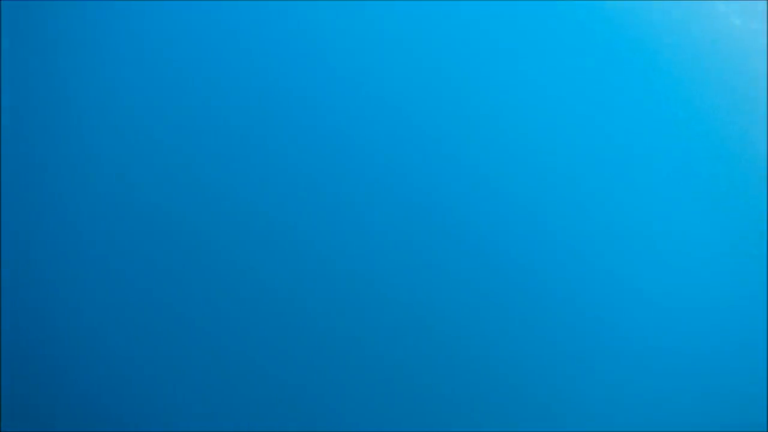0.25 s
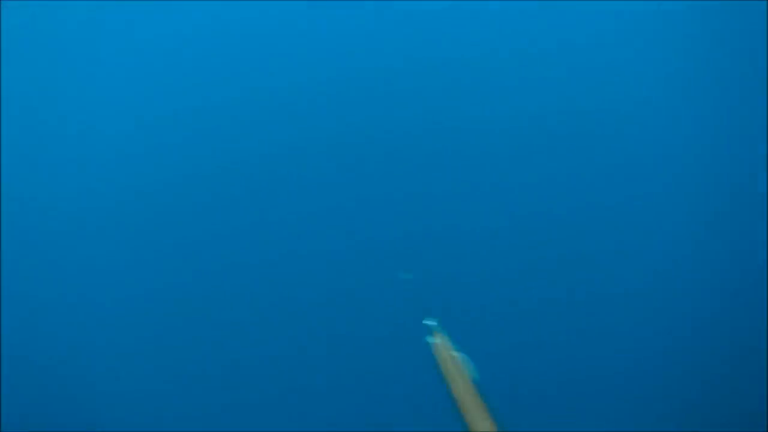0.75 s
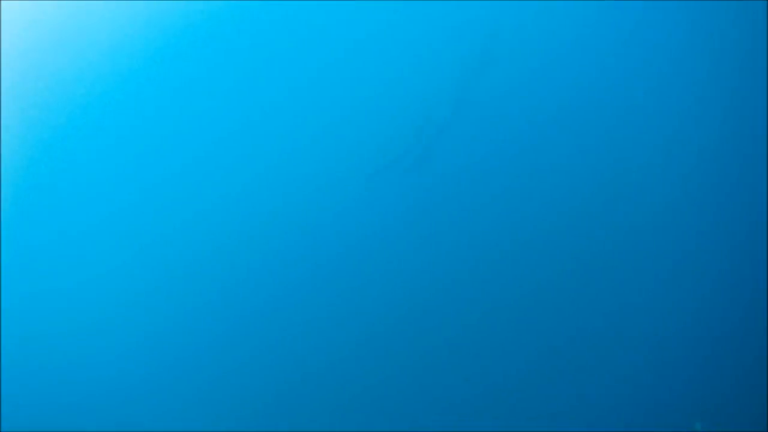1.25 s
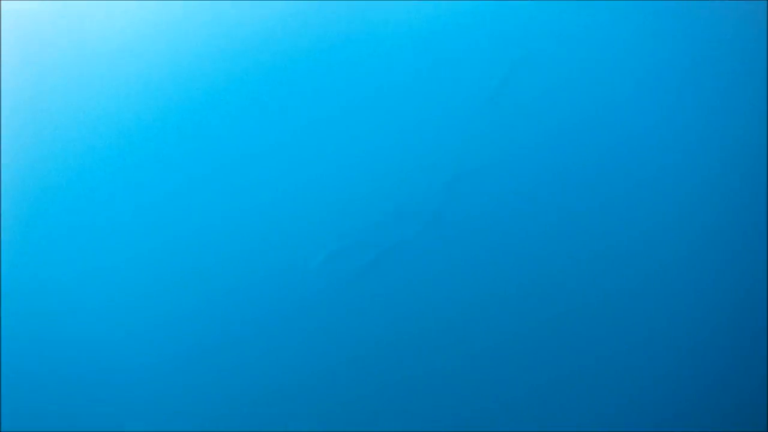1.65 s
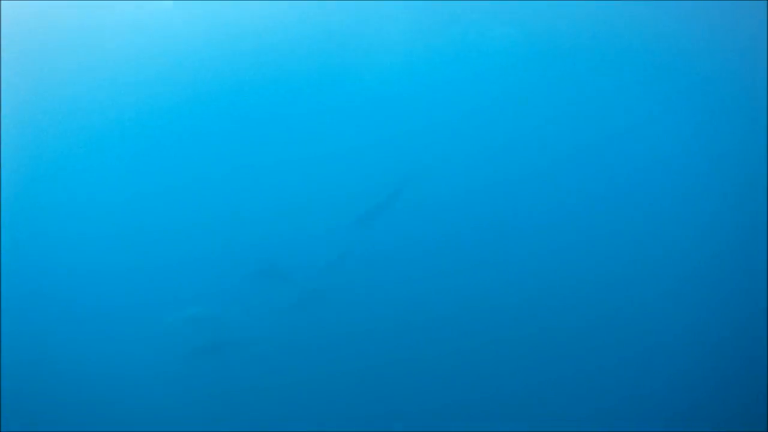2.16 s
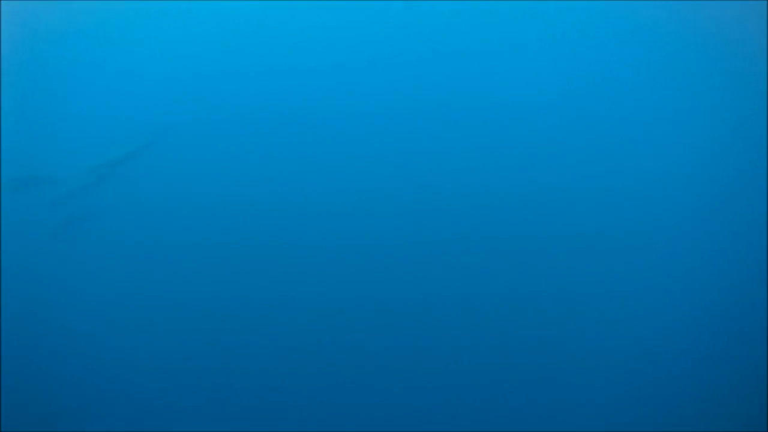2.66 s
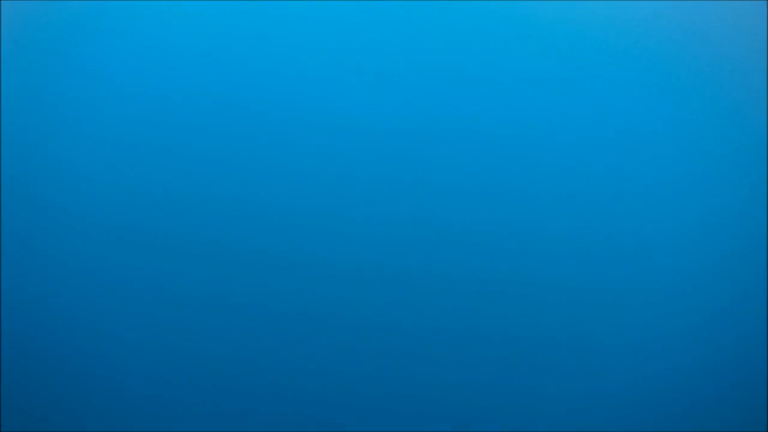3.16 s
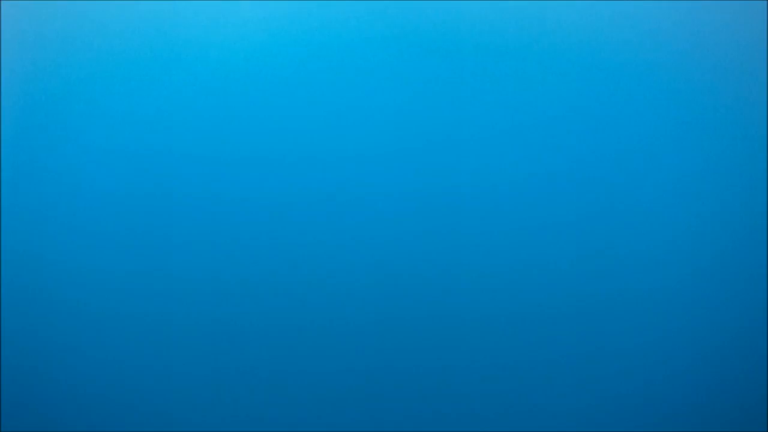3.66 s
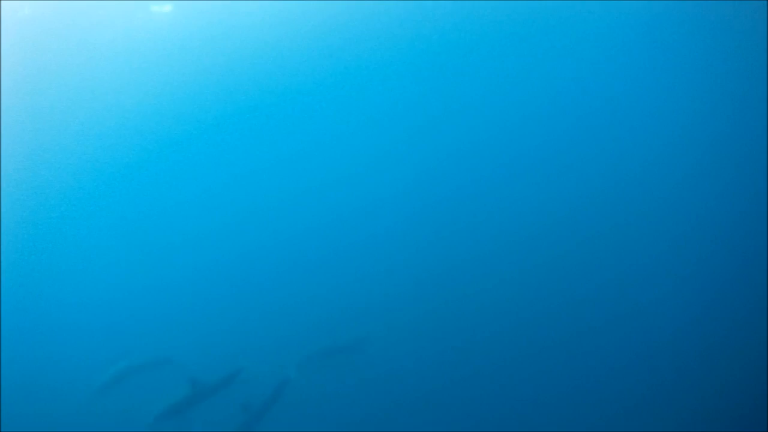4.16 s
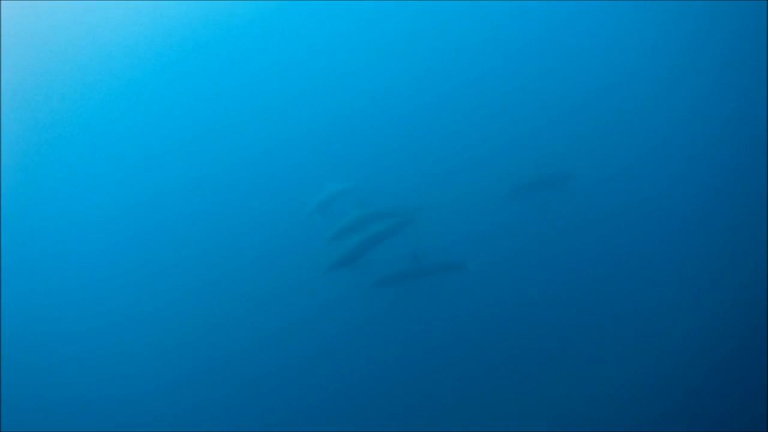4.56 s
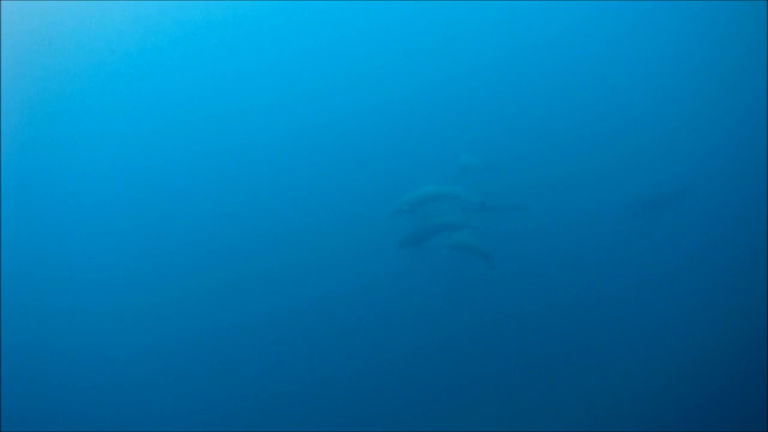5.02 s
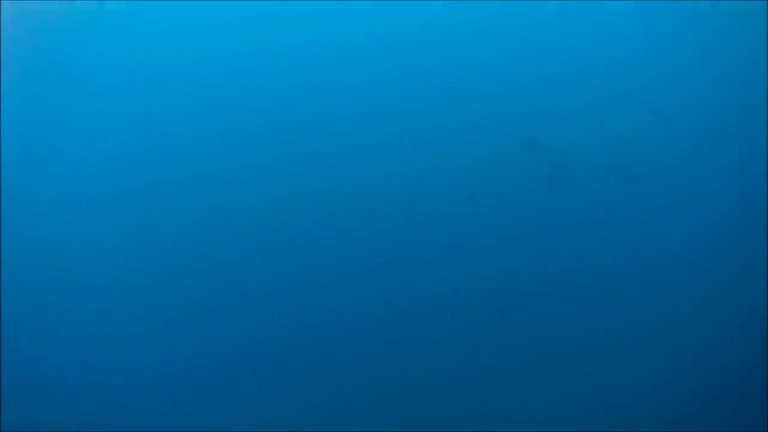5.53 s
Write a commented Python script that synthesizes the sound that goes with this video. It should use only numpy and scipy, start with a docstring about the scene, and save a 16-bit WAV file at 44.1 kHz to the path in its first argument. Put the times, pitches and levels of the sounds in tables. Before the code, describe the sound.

Muffled underwater rumble and hollow wash inside a camera case, with sharp knocks clustered early and mid-way, and faint dolphin whistles, clearest near five seconds.

```python
"""The sea rumbles and washes round a watertight camera housing throughout, while knocks land on its case now and then.
Place: under the open sea, the microphone inside the case; noise is shaped by flow, wash bands and resonances.
At the case: knocks, bumps and ticks are short pulses, rubs and snaps are noise bursts, hums are sagging tones.
At a distance: dolphins whistle faintly, as tones with bending pitch; all but the nearest are smeared by late paths.
The mono recorder samples slowly and holds each value, which adds a thin, mirrored treble."""
import sys
import numpy as np
from scipy import signal
from scipy.fft import rfft, irfft, next_fast_len
from scipy.io import wavfile
from scipy.ndimage import map_coordinates

SR = 44100
rng = np.random.default_rng(int(sys.argv[2]) if len(sys.argv) > 2 else 0)


def log_audio(samples):
    """Write samples as a 16-bit WAV file to the path given in sys.argv[1]."""
    # one column per channel
    frames = np.atleast_2d(samples).T
    # limit to full scale, then quantise
    limited = np.clip(frames, -1, 1)
    pcm = np.round(limited * 32767).astype(np.int16)
    wavfile.write(sys.argv[1], SR, pcm)


N = 255339


def amp(db):
    """Decibels to gain."""
    return 10 ** (np.asarray(db) / 20)


def unit(x):
    """x at rms 1."""
    return x / np.sqrt(np.mean(x ** 2) + 1e-20)


def bell(x):
    """Gaussian of a distance given in standard deviations."""
    return np.exp(-.5 * x ** 2)


def shape(points, hz):
    """Gain through (f/Hz, level/dB) points, joined on a log frequency axis."""
    f, db = np.transpose(points)
    return amp(np.interp(np.log(hz + 1), np.log(f + 1), db))


def curves(rows):
    """One value per sample for each column after the time."""
    s, *columns = np.transpose(rows)
    return [np.interp(np.arange(N) / SR, s, column) for column in columns]


def wobble(rate):
    """A smooth random curve, rate knots a second."""
    at = np.linspace(0, N * rate / SR, N // 16)
    coarse = map_coordinates(rng.standard_normal(int(at[-1]) + 4), [at])
    return np.interp(np.arange(N) * rate / SR, at, coarse)


def filtered(x, response):
    """x times a response of frequency."""
    m = next_fast_len(N + SR // 2)
    return irfft(rfft(x, m) * response(np.fft.rfftfreq(m, 1 / SR)), m)[:N]


def noise(response):
    """Coloured noise of rms 1."""
    return unit(filtered(rng.standard_normal(N), response))


def contacts(rows, scuff_db=-10.5, scuff_s=0.0063):
    """Each contact is a short push and pull, then a brief random scuff as it settles."""
    half = SR // 25
    t = np.arange(-half, half) / SR
    out = np.zeros(N + SR)
    for s, db, hz, cycles in rows:
        push = amp(db) * bell(t * hz / cycles) * np.sin(2 * np.pi * hz * t)
        scuff = rng.standard_normal(half) * np.exp(-t[half:] / scuff_s)
        tail = signal.fftconvolve(push, scuff / np.linalg.norm(scuff))[:len(t)]
        out[round(s * SR):][:len(t)] += push + amp(scuff_db) * tail
    return out[half:half + N]


def tone(start, end, hz, db, waver, flutter_db, fade_s=0.0074):
    """A tone whose pitch and level tremble."""
    t = np.arange(N) / SR
    gate = np.clip(np.minimum(t - start, end - t) / fade_s, 0, 1)
    phase = 2 * np.pi * np.cumsum(hz * (1 + waver * wobble(150))) / SR
    return gate * amp(db + flutter_db * wobble(45)) * np.sqrt(2) * np.sin(phase)


def glide(start, length, db, pitches, edge_db, waver, flutter_db):
    """A tone that swells and fades while its pitch bends in one arc through start, middle and end."""
    u = np.clip(2 * (np.arange(N) / SR - start) / length - 1, -1, 1)  # -1 at the start, 1 at the end
    first, middle, last = pitches
    slope = (last - first) / 2
    bend = (first + last) / 2 - middle
    hz = middle + slope * u + bend * u ** 2
    return tone(start, start + length, hz, db - edge_db * u ** 2, waver, flutter_db)


def wall(x, edge_hz=2480, order=10):
    """The thick wall of the case lets little treble through."""
    return signal.sosfilt(signal.butter(order, edge_hz, fs=SR, output="sos"), x)


def housing(x, round_trip_hz=657, stretch=0.944, echo=0.36, ring=0.49):
    """Sound runs to and fro in the case: a comb of resonances, spread a little wider than harmonics."""
    def response(hz):
        trip = np.exp(-2j * np.pi * (hz / round_trip_hz) ** stretch)
        return (1 + echo * trip) / (1 - ring * trip)
    return filtered(x, response)


# Hard contacts on the case, before wall and housing:
# [t/s, level/dB of the pulse scale, f/Hz, Gaussian half length/cycles]
HARD_KNOCKS = [ (.2654, -23.5, 1010, 0.083), (.3277, -13, 1880, 0.53), (.328, -24.5, 364, 0.23),
               (.3593, -33.5, 630, .25), (.3669, -28, 950, 0.19), (.5317, -37.5, 640, 0.82),
               (.5445, -35, 600, 0.24), (.5615, -36.5, 610, 0.37), (.8458, -37, 2240, 0.56),
               (1.2073, -41, 1370, 0.95), (1.7932, -32.5, 1250, .14), (1.8719, -32, 890, 0.099),
               (2.0156, -35.5, 890, .23), (2.1925, -41, 880, 0.26), (2.244, -28, 900, 0.067),
               (2.3323, -25.5, 960, 0.12), (2.3727, -31, 1690, 0.38), (2.3758, -31, 1680, .41),
               (2.3807, -28, 2120, 0.83), (2.5568, -27.5, 1420, 0.3), (2.5714, -29.5, 830, 0.15),
               (2.6309, -24.5, 415, 0.24), (2.636, -26.5, 646, 0.32), (2.6845, -23.5, 900, 0.12),
               (2.6891, -25.5, 734, 0.27), (4.0167, -38.5, 1710, 0.53), (4.0209, -41, 1460, 0.57),
               (4.179, -37, 440, 0.16), (4.2072, -34, 1350, 0.51), (5.342, -33, 1250, 0.24),
               (5.3537, -33.5, 1550, .9), (5.3986, -29, 1790, 0.34), (5.4322, -34.5, 1570, .67),
               (5.4729, -32.5, 340, .17), (5.7747, -40.5, 500, 0.23)]
# Soft bumps of the grip, likewise: [t/s, level/dB of the pulse scale, Gaussian half length/cycles]
GRIP_BUMPS = [(.416, -37.5, .65), (0.644, -42.5, .27), (1.113, -37, 0.16), (2.379, -30.5, 0.1),
              (2.4425, -35, .16), (2.5384, -32, 0.15), (2.634, -24, 0.59), (2.776, -41, 0.39),
              (2.872, -39.5, 0.23), (2.903, -36, 0.13), (4.149, -43, 0.42), (4.207, -34, 0.18),
              (5.2359, -26.5, .22)]


def handling(bump_hz=161.3):
    """Hard knocks are quick pushes on the case; soft bumps are slow ones that share one low pitch."""
    bumps = [(s, db, bump_hz, cycles) for s, db, cycles in GRIP_BUMPS]
    return contacts(HARD_KNOCKS) + contacts(bumps)


# Sharp snaps right on the case: [t/s, level/dB before gain and colour, decay time constant/s]
CASE_SNAPS = [(0.4907, -22, 0.003), (0.5433, -26, 0.0023), (0.5529, -30.5, 0.0027)]
# Treble colour of every snap: [f/Hz, level/dB]
SNAP_SPECTRUM = [(600, -41), (1800, -5.5), (2400, 2.5), (3200, 1.5), (3750, 5), (4400, -5), (5200, 1),
                 (5900, -11)]


def snaps(gain_db=19.6, rattle_db=-2):
    """One instant crack, then a rattle that dies within a few milliseconds."""
    t = np.arange(SR // 25) / SR
    out = np.zeros(N)
    for s, db, decay_s in CASE_SNAPS:
        crack = t == 0
        rattle = rng.standard_normal(len(t)) * np.exp(-t / decay_s)
        rattle = rattle / np.linalg.norm(rattle)
        out[round(s * SR):][:len(t)] += amp(db) * (crack + amp(rattle_db) * rattle)
    return amp(gain_db) * filtered(out, lambda hz: shape(SNAP_SPECTRUM, hz))


# Something brushes the case: [t/s, Gaussian half length/s, level/dB, f/Hz at the centre of the friction]
CASE_RUBS = [(0.368, 0.019, -46.5, 1510), (0.927, 0.028, -55.5, 1400), (2.373, 0.035, -63, 1490),
             (3.295, 0.059, -55.5, 1220), (4.411, 0.013, -55.5, 1800), (5.32, .014, -52.5, 1650)]


def rubs(grain_db=5.0, spread=0.32):
    """Grainy friction swells and fades, exciting the resonances of the case."""
    t = np.arange(N) / SR
    out = np.zeros(N)
    for s, half_s, db, pitch_hz in CASE_RUBS:
        friction = noise(lambda hz: bell((hz / pitch_hz - 1) / spread))
        grainy = friction * amp(grain_db * wobble(300))
        out += amp(db) * bell((t - s) / half_s) * unit(housing(grainy))
    return out


# The lowest band of the case hums: [start t/s, length/s, level/dB at the middle]
CASE_HUMS = [(3.678, 0.1, -54.5), (3.972, 0.15, -55), (4.277, 0.16, -60.5)]


def hums(middle_hz=652, sag_hz=24, edge_db=10.5):
    """Short hums near the lowest resonance of the case, each sagging by sag_hz over each half."""
    pitches = middle_hz + sag_hz, middle_hz, middle_hz - sag_hz
    return sum(glide(s, length, db, pitches, edge_db, waver=0.0198, flutter_db=0.5)
               for s, length, db in CASE_HUMS)


# Runs of soft ticks, like distant dolphin clicks, before wall and housing:
# [start t/s, end t/s, rate/ticks per s, level/dB of the pulse scale before scatter, f/Hz]
TICK_TRAINS = [(0.405, .80, 38, -37, 1930), (1.144, 1.75, 13, -37, 1480), (1.822, 2.16, 41, -37.5, 1480)]


def trains(jitter=.06, scatter_db=1.5, cycles=0.18):
    """Ticks follow each other at a nearly even pace."""
    rows = []
    for start, end, rate, db, hz in TICK_TRAINS:
        even_s = np.arange(start, end, 1 / rate)
        late, loud = rng.standard_normal((len(even_s), 2)).T
        times = even_s + jitter * late / rate
        rows += [(s, db + scatter_db * extra, hz, cycles) for s, extra in zip(times, loud)]
    return contacts(rows)


def sea_paths(x, late_db=-3, spread_s=0.0081):
    """Far sounds also arrive late by way of the waves overhead, which smears them at the same rms."""
    t = np.arange(SR // 10) / SR
    tail = rng.standard_normal(len(t)) * np.exp(-t / spread_s)
    late = signal.fftconvolve(x, tail / np.linalg.norm(tail))[:N]
    return unit(x + amp(late_db) * late) * x.std()


# Far, short dolphin whistles:
# [start t/s, length/s, level/dB at the middle before gain, f/Hz at start, f/Hz at middle, f/Hz at end]
FAR_WHISTLES = [(.345, .14, -70, 4350, 5100, 5600), (.75, .07, -76, 5200, 4950, 4700),
                (.85, .07, -78, 4350, 4530, 4680), (1.07, .05, -77, 4360, 4570, 4740),
                (1.34, .06, -78, 5100, 5450, 5700), (1.61, .06, -72, 5350, 5680, 5950),
                (2.59, .07, -77, 5500, 5800, 5950), (3.04, .045, -65.5, 4550, 5150, 5300),
                (3.74, .31, -70.5, 2520, 2500, 2390), (4.09, .055, -76, 6000, 5680, 5250),
                (4.26, .1, -72, 3400, 4800, 6000), (4.33, .2, -76.5, 3780, 3770, 3720),
                (4.97, .15, -68.5, 3890, 3840, 3910), (5.19, .18, -71.5, 3810, 3800, 3950),
                (5.36, .14, -69.5, 3930, 3810, 3760), (5.47, .075, -66, 3780, 3740, 3960),
                (5.65, .14, -72.5, 4000, 3800, 3700)]
# The nearest dolphin's long whistle dips, holds and rises: [t/s, f/Hz, level/dB before gain]
NEAR_WHISTLE = [(4.67, 5750, -82), (4.72, 5090, -70), (4.78, 4990, -68), (4.94, 5015, -67),
                (5.04, 5130, -70), (5.085, 5310, -69), (5.15, 5420, -76), (5.19, 5950, -80)]


def dolphins(near_gain_db=1.0, far_gain_db=0.7, edge_db=5.5):
    """One clear whistle from the nearest animal, and faint, smeared ones from the rest of the school."""
    far = sum(glide(s, length, db + far_gain_db, pitches, edge_db, waver=0.00514, flutter_db=1.0)
              for s, length, db, *pitches in FAR_WHISTLES)
    start, end = NEAR_WHISTLE[0][0], NEAR_WHISTLE[-1][0]
    hz, db = curves(NEAR_WHISTLE)
    near = tone(start, end, hz, db + near_gain_db, waver=0.0023, flutter_db=1.0)
    return sea_paths(far) + near


# The case is swung and eddies push on it: [t/s, Gaussian half length/s, flow level/dB before gain]
CASE_SURGES = [(0.302, 0.046, -44), (0.684, 0.094, -42), (1.003, .04, -45), (2.63, 0.086, -50),
               (3.073, 0.029, -46), (3.392, 0.023, -54), (3.946, 0.052, -45), (5.41, 0.095, -49),
               (5.682, 0.042, -46)]
DRIFT_DB = -53  # flow level between the surges, before sway and gain


def flow(sway_db=3.1):
    """Strength of the water's push: a slowly swaying drift, plus a swell for each swing of the case."""
    t = np.arange(N) / SR
    swells = sum((amp(db) * bell((t - s) / half_s)) ** 2 for s, half_s, db in CASE_SURGES)
    drift = amp(DRIFT_DB + sway_db * wobble(6.07))
    return np.sqrt(drift ** 2 + swells)


# Sea noise round the case, before gains and wobble: [t/s, slosh level/dB, wash level/dB]
SEA_LEVELS = [(0.0, -65, -55.5), (0.55, -58.5, -57.5), (1.19, -64.5, -58.5), (1.64, -66, -58.5),
              (2.66, -62.5, -58.5), (3.13, -67, -58.5), (3.72, -65, -57.5), (4.18, -61, -57),
              (4.53, -63.5, -58), (5.05, -68, -57.5), (5.4, -60, -57.5), (5.79, -66.5, -60)]
# Bands in which the case lets the sea through: [f/Hz, width/Hz, relative level/dB per Hz]
SEA_BANDS = [(663, 100, 2), (1309, 137, 0), (2060, 295, -2.5), (2684, 430, -15), (3680, 505, -18.5),
             (5090, 1050, -20.5)]
# Relative colour of the rumble: [f/Hz, level/dB per Hz]
RUMBLE_SPECTRUM = [(8, -16), (20, -0.5), (38, -4), (55, -8), (90, -20.5), (150, -49), (400, -120)]
# Relative colour of the slosh: [f/Hz, level/dB per Hz]
SLOSH_SPECTRUM = [(40, -28), (90, 0), (170, 0), (230, -7), (380, -9.5), (480, -10), (800, -19), (2000, -35)]


def water(rumble_gain_db=-1.3, slosh_gain_db=1, wash_gain_db=-0.47):
    """Eddies push on the case, and the sea's wash comes through its bands, each swelling on its own."""
    slosh_db, wash_db = curves(SEA_LEVELS)
    rumble = amp(rumble_gain_db) * flow() * noise(lambda hz: shape(RUMBLE_SPECTRUM, hz))
    slosh_level = amp(slosh_db + slosh_gain_db + 3.5 * wobble(30))
    slosh = slosh_level * noise(lambda hz: shape(SLOSH_SPECTRUM, hz))
    wash = np.zeros(N)
    for centre, width, db in SEA_BANDS:
        band = noise(lambda hz: (1 + ((hz - centre) / (1.136 * width)) ** 2) ** -1.5)
        wash += amp(db + 1.32 * wobble(14)) * np.sqrt(width) * band
    wash = unit(wash * amp(1.97 * wobble(140)))  # a fast tremble shared by all bands
    return rumble + slosh + amp(wash_db + wash_gain_db) * wash


def eddies(level_db=-74, grows=1.7, centre_hz=80, spread=0.24):
    """A faster flow sheds smaller eddies, so strong surges reach higher in pitch."""
    strength = (flow() / amp(DRIFT_DB)) ** grows
    return amp(level_db) * strength * noise(lambda hz: bell((hz / centre_hz - 1) / spread))


def crackle(count=130, spread_db=3.5, pitch_hz=1550, over_wash_db=10, pitch_spread=.1):
    """Scattered faint ticks in the water, stronger when the wash is strong."""
    s = rng.uniform(0, N / SR, count)
    _, wash_db = curves(SEA_LEVELS)
    extra_db = spread_db * np.minimum(rng.exponential(size=count), 2.5)
    db = wash_db[(s * SR).astype(int)] + over_wash_db + extra_db
    hz = pitch_hz * np.exp(pitch_spread * rng.standard_normal(count))
    cycles = rng.uniform(0.075, 0.36, count)
    return contacts(np.transpose([s, db, hz, cycles]))


def scene():
    """Everything reaches one microphone inside the case."""
    through_wall = housing(wall(handling() + trains() + crackle()))
    case = through_wall + rubs() + snaps() + hums()
    mono = case + dolphins() + water() + eddies()
    return np.array([mono, mono])


def record(dry, top_hz=15500):
    """Sampling at 12 kHz and holding each value mirrors the sound round 6 and 12 kHz, up to top_hz."""
    # the gentle window lets some sound above 6 kHz fold back
    slow = signal.resample_poly(dry, 40, 147, axis=1, window=("kaiser", 3))
    steps = np.repeat(slow, 8, axis=1)  # held values at 96 kHz
    held = signal.resample_poly(steps, 147, 320, axis=1)
    return np.array([filtered(channel[:N], lambda hz: hz < top_hz) for channel in held])


dry = scene()
out = record(dry)
log_audio(out)
```